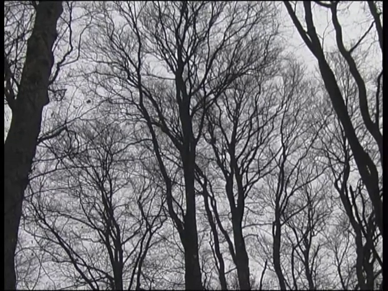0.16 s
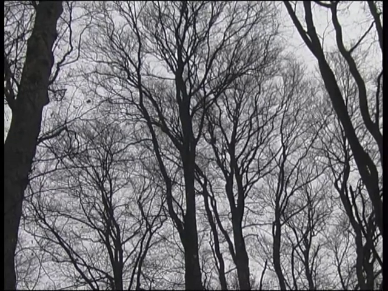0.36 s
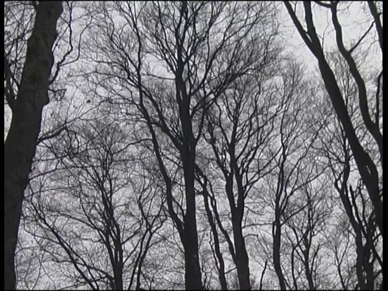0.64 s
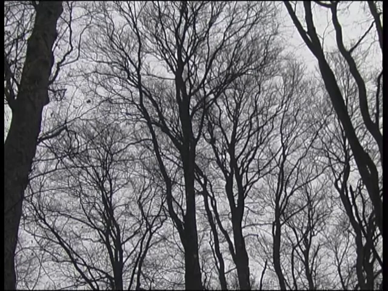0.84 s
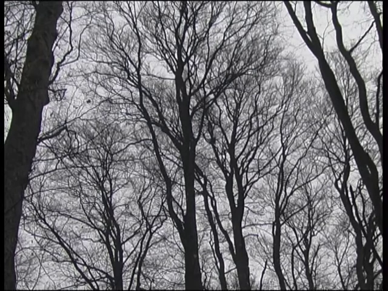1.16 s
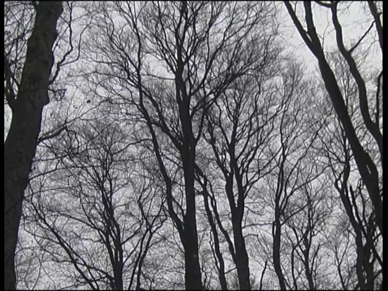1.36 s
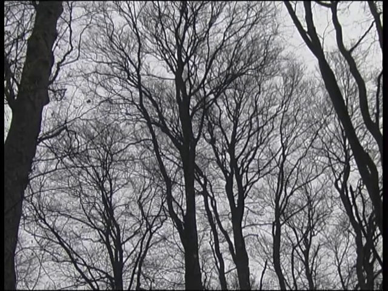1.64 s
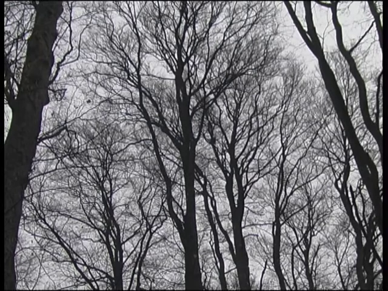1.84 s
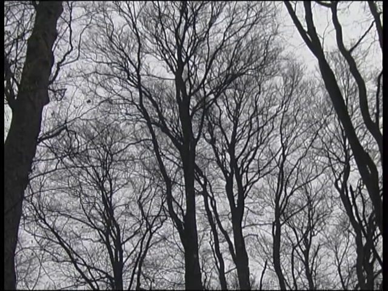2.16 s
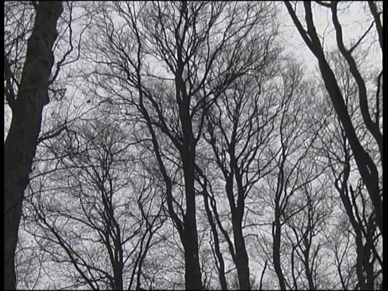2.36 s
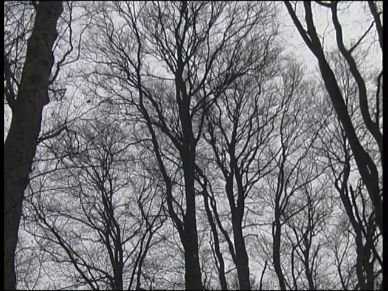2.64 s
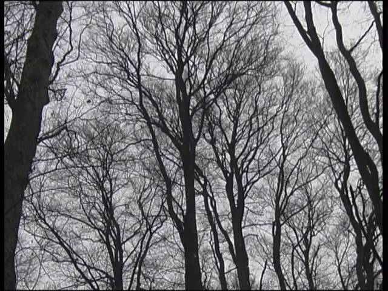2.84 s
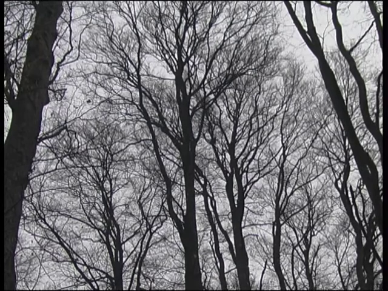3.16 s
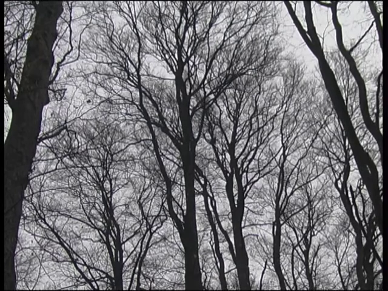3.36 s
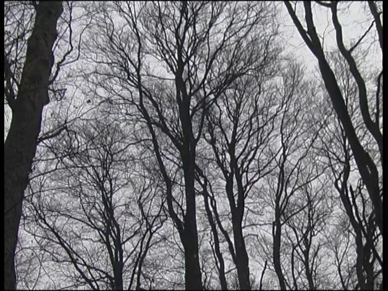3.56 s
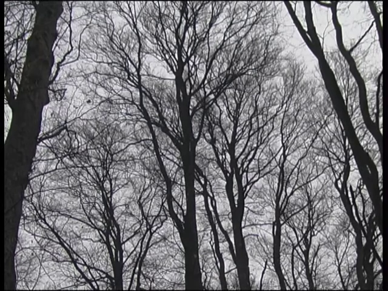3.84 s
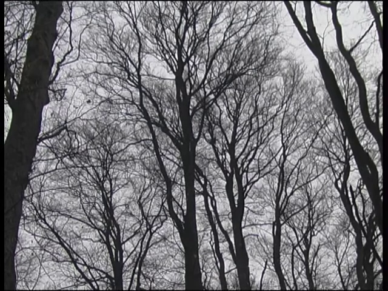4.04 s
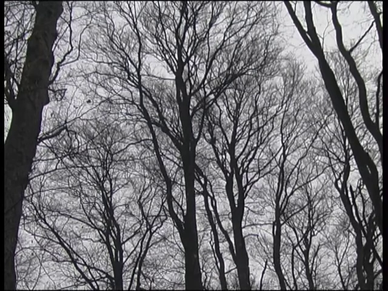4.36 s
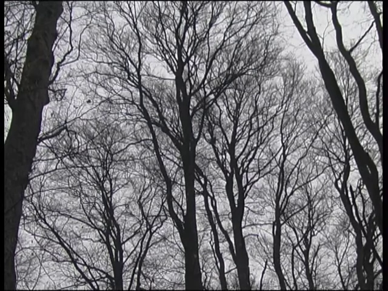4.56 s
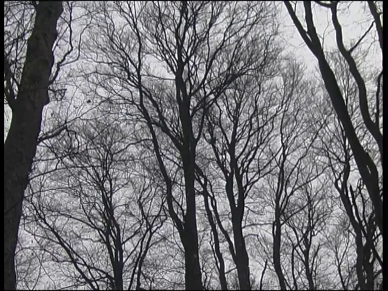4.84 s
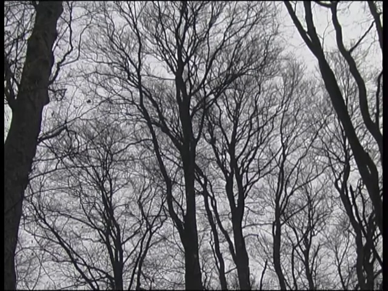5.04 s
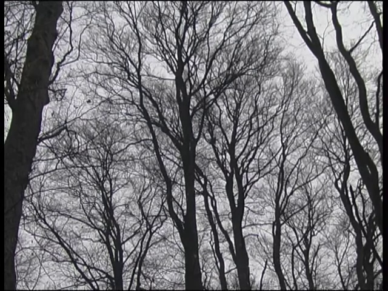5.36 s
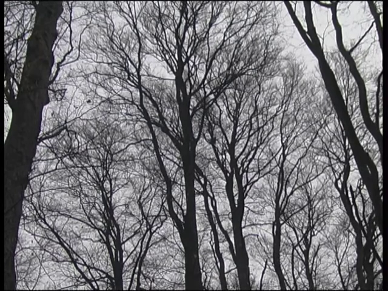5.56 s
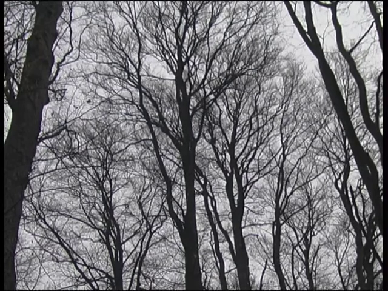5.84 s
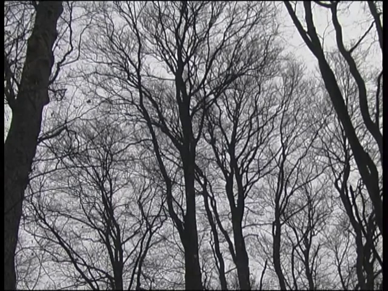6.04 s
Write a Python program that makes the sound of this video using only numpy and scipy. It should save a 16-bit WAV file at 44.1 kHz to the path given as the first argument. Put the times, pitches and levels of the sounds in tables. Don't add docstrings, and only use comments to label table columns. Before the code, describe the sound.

A quiet, leafless forest, heard through a camera microphone with steady soft hiss, a very thin high whine and low wind bumps. From 0 to 0.75 s, small far birds whistle and chirp. At 0.8 s a woodpecker drums a sharp, dry roll of about twelve accelerating blows, ending near 1.4 s, with echoes off the trunks. A nearby finch starts around 0.95 s, its trill of quick diving syllables growing louder and sinking in pitch until 2.35 s, then rapid warbles and flicks, a falling rattle at 2.8 s, two hooked notes just after 3 s, and a last twisting flourish by 3.66 s. A gust swells near 3.4 s. Faint calls fill the gap. From 4.77 to 5.4 s a second woodpecker rolls on a hollow limb, about sixteen quickening blows fading away, ringing around the trees. Tiny twig snaps click at 1.2, 3.25, 4.6 and 5.05 s. Distant birds and hiss remain to about 6.2 s.

```python
import sys
import numpy as np
from scipy import signal
from scipy.fft import rfft, irfft, next_fast_len
from scipy.io import wavfile
from scipy.ndimage import uniform_filter1d, map_coordinates

SR = 44100
rng = np.random.default_rng(int(sys.argv[2]) if len(sys.argv) > 2 else 0)


def level_to_linear(level):
    exponent = np.asarray(level, float) / 20
    return 10 ** exponent


def transcribe(u):
    v = np.clip(np.atleast_2d(u).T, -1, 1)
    q = np.round(v * 32767).astype(np.int16)
    wavfile.write(sys.argv[1], SR, q)


N = 273861
T = np.arange(N) / SR


def unit(x):
    return x / np.sqrt(np.mean(x ** 2) + 1e-20)


def along(points, hz):
    f, v = np.transpose(points)
    return np.interp(np.log(hz + 1), np.log(f + 1), v)


def curve(rows):
    return np.interp(T, *np.transpose(rows))


def wobble(rate):
    knots = rng.standard_normal(int(N * 200 / SR) + 4)
    return map_coordinates(knots, [T * min(rate, 200)])


def filtered(x, response):
    m = 2 * next_fast_len(N // 2 + SR // 4)
    return irfft(rfft(x, m) * response(np.fft.rfftfreq(m, 1 / SR)), m)[..., :N]


def noise(spectrum, patchy_db):
    z = signal.stft(rng.standard_normal(N), nperseg=512)[2]
    patches = uniform_filter1d(rng.standard_normal(z.shape), size=4, axis=0)
    patches = uniform_filter1d(patches, size=10, axis=1)
    x = signal.istft(z * level_to_linear(patchy_db * unit(patches)), nperseg=512)[1][:N]
    return unit(filtered(x, lambda hz: level_to_linear(along(spectrum, hz))))


def forest(x, gap, early_db, lumpy_db, early_t60=0.28):
    # (frequency [Hz], t60 [s])
    decay = [(200, 0.24), (900, 2.38), (3000, 0.92), (6000, 0.76), (10000, 0.034)]
    hz, t, z = signal.stft(rng.standard_normal(SR * 3 // 2), SR, nperseg=256)
    late = level_to_linear(-60 * t / along(decay, hz)[:, None])
    early = 1 + level_to_linear(early_db - 60 * t / early_t60)
    big_trunks = level_to_linear(lumpy_db * rng.standard_normal(len(t)) * np.exp(-t / .2))
    tail = signal.istft(z * late * early * big_trunks, SR, nperseg=256)[1]
    tail = tail * (1 - np.exp(-(np.arange(len(tail)) / (SR * gap)) ** 2))
    return signal.fftconvolve(x, tail / np.linalg.norm(tail))[:N]


def resonances(modes, f):
    return sum((-1) ** k * level_to_linear(db) * 1j * f * w / (c * c - f * f + 1j * f * w)
               for k, (c, w, db) in enumerate(modes))


def note_time(length):
    return np.arange(round(length * SR)) / SR


def sing(add, s, t, hz, gain):
    ends = np.clip(np.minimum(t, t[-1] - t) / .002, 0, 1)
    add[round(s * SR):][:len(t)] += gain * ends * np.sin(2 * np.pi * np.cumsum(hz) / SR)


def path(f, copies):
    near_ms, bark_hz = 2.8, 2220
    taps = np.zeros((2, 2 * len(f) - 2))
    for ms, db in copies:
        taps[int(ms > near_ms), round(ms * SR / 1000)] = level_to_linear(db)
    straight, late = rfft(taps)
    return straight + late / (1 + (f / bark_hz) ** 6)


def drum(blows, click, wood, body, echoes, click_db, wood_db, wet_db, wood_wet_db, dull_hz, thin_hz, gap):
    crack, push = np.zeros((2, N))
    for s, db, *tone_db in blows:
        crack[round(s * SR)] = level_to_linear(db + click_db)
        push[round(s * SR)] = level_to_linear(db + sum(tone_db) + wood_db)
    crack = filtered(crack, lambda f: -resonances(click, f) ** 2)
    tone = filtered(push, lambda f: resonances(wood, f) ** 2)

    dull_crack = filtered(crack, lambda f: 1 / (1 + 1j * f / dull_hz) ** 3)
    thin_tone = filtered(tone, lambda f: (1j * f / (thin_hz + 1j * f)) ** 3)
    sent = level_to_linear(wet_db) * dull_crack + level_to_linear(wood_wet_db) * thin_tone

    low = filtered(push, lambda f: resonances(body, f) ** 2 * (1 + level_to_linear(-9) * np.exp(2j * np.pi * f * .014)))
    arrivals = filtered(np.array([crack, tone]), lambda f: [path(f, copies) for copies in echoes])
    near = low + arrivals.sum(axis=0)
    return near + forest(sent + level_to_linear(-7) * low, gap, early_db=7.5, lumpy_db=4.0, early_t60=0.74)


def camera():
    # (frequency [Hz], level [dB per Hz])
    hiss_colour = [(3000, -19), (6000, -1), (9000, -2.5), (12000, -0.4), (15700, 0)]
    # (frequency [Hz], share [0-1])
    unlike = [(4000, .01), (7000, 0.31), (10000, 0.64), (13000, 0.33), (15700, 0.13)]
    # (frequency [Hz], level [dB])
    whines = [(11472, -82), (11698, -95), (13273, -75), (13573, -77), (15375, -81)]
    line_hz, field_hz, hum_hz = 15622.5, 50, 150
    both, apart = noise(hiss_colour, patchy_db=0), noise(hiss_colour, patchy_db=0)
    apart = filtered(apart, lambda f: np.clip(along(unlike, f), 0, 1))
    hum = level_to_linear(-61 + 0.36 * wobble(5.5)) * np.sin(2 * np.pi * hum_hz * T + 1.7 * wobble(6))
    field = (T - .008) * field_hz
    odd = uniform_filter1d(1. * (field % 2 > 1.1), size=60)
    lit = uniform_filter1d(1. * (field % 1 < .81), size=60)
    whine = odd * sum(level_to_linear(db) * np.sin(2 * np.pi * hz * T) for hz, db in whines)
    line = lit * level_to_linear(-69.5 + 3 * odd - 4 * (field % 1)) * np.sin(2 * np.pi * line_hz * T)
    hiss = level_to_linear(-70.0 + 1.8 * odd) * np.array([both + apart, both - apart])
    return hiss + hum + whine + level_to_linear([[1.6], [-1.6]]) * line


def air():
    # (time [s], peak level [dB])
    gust_peaks = [(.07, -78), (.3, -64), (.52, -60), (1.3, -59), (2.17, -57.5), (2.42, -65), (2.76, -59.5),
                  (3.43, -52.5), (4, -72), (4.36, -57.5), (4.6, -67), (4.78, -79), (5.68, -64), (6.18, -62)]
    # (frequency [Hz], level [dB per Hz])
    wind_colour = [(12, -35), (20, -9.5), (54, -4.5), (97, -6.5), (123, -10), (140, -9), (180, -36),
                   (310, -120)]
    # (frequency [Hz], level [dB per Hz])
    road_colour = [(59, -55), (100, -15), (152, -3), (306, -5), (367, -6.5), (828, -11.5), (1530, -23.5),
                   (5000, -87)]
    # (frequency [Hz], level [dB per Hz])
    chorus_colour = [(900, -24.5), (1740, -22.5), (3580, -16.5), (4770, -20.5), (5720, -29), (7500, -35.5),
                     (9750, -42), (16500, -120)]
    # (time [s], level [dB])
    chorus_swell = [(0, 2), (1, 4), (2, 7), (3, 5), (4, 2), (4.6, 2.5), (5.4, 4), (5.8, 1.5), (6.21, 4)]
    calm_db, rise, fall = -68, 144, 99
    s, peak_db = np.transpose(gust_peaks)[:, :, None]
    gusts = level_to_linear(peak_db - np.maximum(rise * (s - T), fall * (T - s))).sum(axis=0)
    wind = (level_to_linear(calm_db) + gusts) * noise(wind_colour, patchy_db=-0.5)
    road = level_to_linear(-59.0) * noise(road_colour, patchy_db=1.0)
    chorus = level_to_linear(-65.5 + curve(chorus_swell)) * noise(chorus_colour, patchy_db=3.0)
    return wind + road + chorus


def far_birds():
    # (time [s], length [s], pitch [Hz], level [dB])
    far_whistles = [(0, 0.24, 1510, -76.5), (.01, 0.077, 1800, -71), (.03, 0.14, 4080, -70),
                    (0.215, 0.13, 3260, -68.5), (0.337, 0.012, 4650, -63), (.365, .012, 4480, -65),
                    (.388, .016, 4120, -68), (0.418, 0.0099, 4020, -55), (0.446, .014, 3900, -65),
                    (0.468, 0.013, 3960, -59), (0.497, 0.011, 3880, -57), (0.61, 0.02, 4350, -61.5),
                    (.62, .08, 2277, -69), (0.732, .014, 4010, -55), (.903, .28, 6840, -76.5),
                    (1.89, .12, 6300, -78), (2.206, 0.23, 6350, -83), (2.209, 0.038, 1355, -65),
                    (3.46, 0.21, 1345, -69.5), (3.56, 0.055, 1143, -63.5), (3.63, 0.093, 1842, -67),
                    (3.9, 0.045, 5900, -67), (3.991, 0.4, 2225, -71.5), (4.122, 0.066, 4340, -59.5),
                    (4.198, 0.32, 2396, -72.5), (4.241, 0.056, 6030, -68), (4.293, .22, 7325, -78.5),
                    (4.321, 0.22, 6200, -83.5), (4.458, 0.056, 4340, -65), (4.571, 0.03, 5930, -65),
                    (4.622, 0.12, 4600, -70), (5.31, 0.13, 6030, -74), (5.958, 0.18, 4600, -77),
                    (6.047, 0.26, 2710, -70.5), (6.064, 0.049, 1535, -63)]
    # (time [s], length [s], from [Hz], to [Hz], level [dB])
    far_chirps = [
        (0.088, 0.028, 3480, 3200, -67),
        (0.153, 0.058, 3280, 2650, -65.5),
        (0.582, 0.068, 3280, 3800, -68),
        (0.659, .046, 3180, 2700, -64),
        (3.835, 0.037, 4100, 2870, -62),
        (4.133, 0.044, 3130, 2500, -59),
        (4.311, 0.02, 4490, 5000, -70),
        (5.332, 0.27, 7000, 6060, -77),
        (5.512, 0.31, 3630, 4180, -76),
        (5.972, .045, 3340, 2640, -66),
    ]
    sag = 0.00055
    calls, breeze = np.zeros(N + SR), wobble(70)
    notes = [(s, length, hz * (1 + sag), hz * (1 - sag), db, 14.7) for s, length, hz, db in far_whistles]
    notes += [(*chirp, 65) for chirp in far_chirps]
    for s, length, start, end, db, rate in notes:
        t = note_time(length)
        turn = 2 * np.pi * rate * t
        hz = start + (end - start) * t / length
        hz = hz * (1 + 7e-6 * rate ** 2 * np.sin(turn))
        gain = level_to_linear(db - 0.13 * min(rate, 60) * np.cos(turn))
        sing(calls, s, t, hz, gain * np.sin(np.pi * t / length) ** 0.031)
    calls = calls[:N] * level_to_linear(2.6 * breeze)
    return calls + level_to_linear(-5.5) * forest(calls, gap=0.0018, early_db=1, lumpy_db=13)


def stub_woodpecker():
    # (time [s], crack level [dB], wood tone above the crack [dB])
    blows = [(.7977, -19.5, 11.5), (.8635, -1, 0.5), (.9259, -0.5, 1.5), (.9877, -2.5, 5),
             (1.0483, -1, 2.5), (1.1053, 1.5, -0.5), (1.1591, 1, 0.5), (1.2086, -13, 12.5), (1.2563, -6, 5),
             (1.3015, -3.5, -1.5), (1.345, -5.5, 0), (1.3893, -4.5, -2)]
    # (frequency [Hz], width [Hz], level [dB])
    click = [(1623, 780, 2), (2680, 410, 3), (3200, 420, -1.5)]
    # (frequency [Hz], width [Hz], level [dB])
    wood = [(292, 28, -1), (520, 190, 2), (886, 730, -11)]
    # (frequency [Hz], width [Hz], level [dB])
    body = [(440, 80, -8), (600, 90, -7)]
    # (delay [ms], level [dB])
    echoes = [
        [(.4, 0), (2.4, -13), (8.9, -8), (11.2, -14), (16.1, -16), (18.8, -7), (28.8, -18), (42.6, -19.5), (61.2, -18)],
        [(-6.9, -16), (-2.8, -12), (1.3, 0), (4.9, -14), (9.5, -19), (13.1, -19), (18.3, -19), (30.2, -16), (48.8, -15)],
    ]
    return drum(blows, click, wood, body, echoes, click_db=-2.0, wood_db=5,
                wet_db=3.0, dull_hz=1550, thin_hz=1460, wood_wet_db=18.5, gap=0.0042)


def flicks(song):
    # (time [s], length [s], from [Hz], to [Hz], level [dB])
    quick_notes = [(0.83, 0.023, 3520, 4770, -55.5), (2.407, .009, 4100, 6400, -51),
                   (2.415, .007, 4400, 6500, -47), (2.42, .006, 6000, 7800, -59),
                   (2.423, 0.01, 5500, 3300, -47), (2.497, 0.01, 4100, 8700, -51),
                   (2.528, .008, 4800, 3400, -49), (2.578, 0.008, 5000, 8300, -53),
                   (2.606, .008, 5000, 3200, -45), (2.612, 0.015, 4100, 3800, -48),
                   (2.683, 0.015, 2200, 2050, -54), (2.74, 0.022, 3200, 3740, -53),
                   (2.767, 0.0067, 4200, 2640, -40), (2.777, 0.005, 2900, 4300, -47),
                   (3.032, 0.0079, 7200, 2970, -47), (3.037, 0.007, 8300, 5450, -55),
                   (3.066, 0.0045, 7200, 5530, -56), (3.2, 0.009, 8400, 3600, -49),
                   (3.234, 0.0048, 6870, 5000, -54), (3.373, 0.011, 3200, 8300, -51),
                   (3.41, 0.016, 4280, 4300, -48), (3.464, 0.008, 4600, 8300, -53),
                   (3.492, .006, 4500, 3300, -51), (3.547, 0.009, 4700, 7800, -56),
                   (3.572, .007, 4600, 3500, -53), (3.654, 0.012, 2250, 1940, -56)]
    for s, length, start, end, db in quick_notes:
        t = note_time(length)
        sing(song, s, t, start + (end - start) * t / length, level_to_linear(db) * np.sin(np.pi * t / length))


def trill(song):
    # (time [s], dive length [s], dive level [dB], rebound level [dB])
    syllables = [(0.963, 0.034, -50, -52), (1.052, 0.028, -45.5, -56), (1.136, 0.031, -43.5, -48),
                 (1.223, 0.028, -40.5, -45), (1.308, 0.029, -38.5, -40.5), (1.388, 0.026, -36.5, -41),
                 (1.464, 0.035, -37, -37), (1.55, 0.02, -35.5, -36), (1.635, 0.019, -36.5, -34),
                 (1.721, 0.018, -34, -40.5), (1.803, 0.019, -38, -34.5), (1.888, .021, -36, -35),
                 (1.975, 0.02, -36.5, -38), (2.063, 0.016, -36.5, -38), (2.151, 0.02, -36.5, -40),
                 (2.238, 0.02, -37.5, -39), (2.327, 0.025, -37, -42.5)]
    # (time [s], top pitch [Hz], rebound pitch [Hz])
    sinking = [(.96, 5360, 4390), (1.14, 5660, 4163), (1.39, 5610, 4093), (1.547, 6100, 4290),
               (1.634, 5360, 3800), (1.72, 4290, 3624), (1.8, 3950, 3330), (1.97, 3420, 3270),
               (2.33, 3180, 3200)]
    when, tops, backs = np.transpose(sinking)
    for s, dive, dive_db, back_db in syllables:
        top, back = np.interp(s, when, tops), np.interp(s, when, backs)
        t = note_time(dive + 0.016)
        high = np.clip((top - 4200) / 2600, 0, 1)
        shelf = .96 * back + high * (top - back)
        hz = np.interp(t, [0, .22 * dive, (.78 + .2 * high) * dive, dive, dive + .007 - .004 * high, dive + .022],
                       [max(top, 3900), shelf, .87 * back, (.67 - 0.041 * high) * back,
                        (.99 - 0.135 * high) * back, (1.0 + 0.21 * high) * back])
        db = np.interp(t, [0, .25 * dive, .7 * dive, dive, dive + .007, dive + .016, dive + .022],
                       [dive_db - 6.5, dive_db - 5.5, dive_db, dive_db - 11 - 3 * high,
                        back_db, back_db - 18 * high, back_db - 20])
        sing(song, s, t, hz, level_to_linear(db))
    t = note_time(0.011)
    for s, *_ in syllables:
        if s > 1.75:
            buzz = np.cos(2 * np.pi * (210 * t + rng.random()))
            swell = abs(np.sin(np.pi * t / t[-1])) ** 0.4
            sing(song, s - 0.0086, t, 4015 * (1 + 0.057 * buzz), level_to_linear(-40.5) * swell)


def warbles(song):
    # (time [s], length [s], from [Hz], to [Hz], level [dB], pitch swings [Hz])
    warbled_notes = [(1.708, 0.02, 4600, 3910, -41, 91), (2.429, 0.029, 4950, 4350, -47, 133),
                     (2.506, 0.03, 6100, 4690, -41, 132), (2.518, 0.034, 8100, 7400, -57, 168),
                     (2.581, 0.019, 6890, 6330, -43.5, 167), (2.593, 0.0183, 5700, 4560, -41, 152),
                     (2.656, 0.034, 5000, 2045, -42.5, 171.2), (2.668, .026, 4300, 2280, -49.5, 174.6),
                     (3.033, 0.028, 4324, 4130, -52, 173), (3.203, 0.0293, 4270, 3865, -52.5, 167),
                     (3.384, 0.037, 6510, 4400, -43, 132.8), (3.469, 0.032, 6000, 4430, -42.5, 107.3),
                     (3.557, 0.022, 6300, 4600, -46.5, 110), (3.632, 0.013, 4460, 4060, -47, 172),
                     (3.641, 0.02, 3890, 1975, -46, 170), (4.062, 0.026, 3294, 3240, -61, 90),
                     (4.554, 0.051, 4980, 4390, -54, 119.3)]
    for s, length, start, end, db, rate in warbled_notes:
        t = note_time(length)
        turn = 2 * np.pi * rate * t
        hz = (start + (end - start) * t / length) * (1 + 0.1 * np.cos(turn))
        swell = np.sin(np.pi * (t / length) ** 0.88) ** 0.51
        sing(song, s, t, hz, level_to_linear(db + 2.0 * np.sin(turn)) * swell)


def rattle(song):
    # (time [s], length [s], from [Hz], to [Hz], level [dB])
    strokes = [(2.779, 0.016, 4480, 2990, -38.5), (2.79, 0.016, 4334, 2820, -39),
               (2.804, 0.017, 4270, 2630, -37.5), (2.819, .016, 3860, 2460, -36.5),
               (2.836, 0.014, 3600, 2270, -39), (2.852, 0.011, 3466, 2250, -34.5),
               (2.867, 0.0127, 2983, 2050, -43), (2.884, .014, 2923, 2100, -40.5),
               (2.903, 0.012, 2813, 1950, -43.5), (2.916, .013, 2730, 1660, -46),
               (2.931, 0.019, 2725, 1280, -57)]
    for s, length, start, end, db in strokes:
        t = note_time(length)
        hz = start + (end - start) * (t / length) ** 1.6
        sing(song, s, t, hz, level_to_linear(db) * np.sin(np.pi * (t / length) ** 1.4) ** 1.2)


def hooks(song):
    # (time after its start [s], pitch [Hz], level [dB])
    hook_shape = [
        (0, 1937, -16.5),
        (0.023, 1982, -13.5),
        (0.039, 2397, -8),
        (.054, 3076, 0.5),
        (0.058, 2900, -4.5),
        (.068, 2164, -16),
        (0.075, 1320, -22),
    ]
    # (time [s], pitch factor [ratio], level [dB])
    hook_starts = [
        (3.064, 1.001, -38),
        (3.233, 1.05, -37.5),
    ]
    when, hz, db = np.transpose(hook_shape)
    t = note_time(when[-1])
    for s, pitch, level_db in hook_starts:
        sing(song, s, t, pitch * np.interp(t, when, hz), level_to_linear(level_db + np.interp(t, when, db)))


def finch():
    # (delay [ms], level [dB])
    trunk_echoes = [(11, -15), (17, -15), (28, -11), (41, -14)]
    song = np.zeros(N + SR)
    for phrase_of in (flicks, trill, warbles, rattle, hooks):
        phrase_of(song)
    song = song[:N]
    phrase = np.digitize(T, [1.3, 1.62, 1.87, 2.13, 2.4, 2.75, 3.02, 3.36])
    wet = sum(forest(song * (phrase == k), gap=.016, early_db=2, lumpy_db=1.5) for k in range(9))

    def straight(f):
        echoes = sum(level_to_linear(db) * np.exp(-2j * np.pi * f * ms / 1000) for ms, db in trunk_echoes)
        return (1 + echoes) / (1 + (f / 5600) ** 4)

    return level_to_linear(6.0) * filtered(song, straight) + level_to_linear(-2) * wet


def twigs():
    # (time [s], peak level [dB])
    snaps = [
        (1.224, -41),
        (3.256, -37),
        (4.592, -43),
        (5.057, -34.5),
    ]
    x = np.zeros(N)
    for s, db in snaps:
        x[round(s * SR)] = level_to_linear(db)
    return filtered(x, lambda f: resonances([(9000, 6000, 0.0062)], f))


def limb_woodpecker():
    # (time [s], level [dB])
    blows = [(4.7734, -2), (4.8259, 0), (4.8766, .5), (4.9265, 0), (4.9734, .5), (5.0183, -1.5),
             (5.0607, -3), (5.1019, -3), (5.1414, -6.5), (5.1808, -7), (5.2207, -14), (5.2584, -11.5),
             (5.2952, -12), (5.3318, -14), (5.3688, -18), (5.4046, -23)]
    # (frequency [Hz], width [Hz], level [dB])
    click = [(1334, 294, 3.5), (1880, 440, 3), (2500, 680, 1), (2900, 810, -1.5), (3600, 450, -6),
             (5320, 1200, -17)]
    # (frequency [Hz], width [Hz], level [dB])
    wood = [(400, 300, -12), (650, 200, -6), (900, 200, 0)]
    # (frequency [Hz], width [Hz], level [dB])
    body = [(348, 52, -9), (480, 110, -8), (640, 50, 2), (760, 90, -1)]
    # (frequency [Hz], width [Hz], level [dB])
    hollow = [(893, 11, -3)]
    # (delay [ms], level [dB])
    echoes = [
        [(-.6, 0), (1.1, -2), (3.15, -4), (4.4, -8.5), (6.3, -12), (14.2, -12.5), (22.7, -17.5), (27.9, -14), (29.4, -13.5), (32.5, -7.5), (36.5, -15), (38.9, -16.5), (47.5, -17), (50.8, -16.5), (57.1, -17), (83.6, -16)],
        [(-9.8, -10.5), (-4.4, -7), (0, 0), (3.2, -4.5), (7.7, -5), (11.4, -9), (14.7, .5), (20.2, -3), (26.3, -5), (29.4, 3), (32.6, -6), (36.3, -10.5), (40.3, -6), (47.1, -6.5), (51.6, -7.5), (54.6, -7.5), (61, -8.5), (69.8, -11), (78.6, -2.5), (84.1, 2), (87.4, -10), (90.9, -4), (107.9, -4.5), (161.6, -10.5), (168.6, -7.5), (175, -12.5), (184, -13), (241.1, -12.5), (245.9, -12), (276.1, -13.5), (310.7, -12.5), (353.5, -11.5)],
    ]
    limb = drum(blows, click, wood, body, echoes, click_db=-0.5, wood_db=11.5,
                wet_db=-7, dull_hz=4600, thin_hz=600, wood_wet_db=4.5, gap=0.013)
    return limb + filtered(limb, lambda f: resonances(hollow, f))


def scene():
    birds = far_birds() + stub_woodpecker() + finch() + limb_woodpecker()
    return camera() + air() + birds + twigs()


def low_pass(x):
    return signal.sosfilt(signal.butter(12, 16610, fs=SR, output="sos"), x)


def record(dry):
    mix = filtered(dry, lambda f: f < 15830)
    return low_pass(mix)


dry = scene()
out = record(dry)
transcribe(out)
```